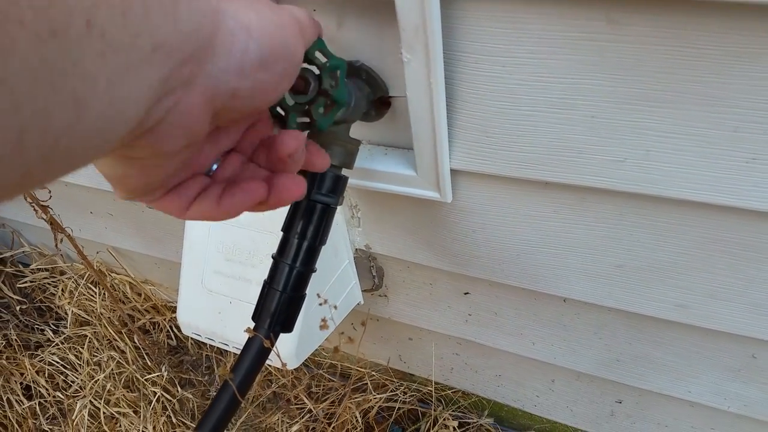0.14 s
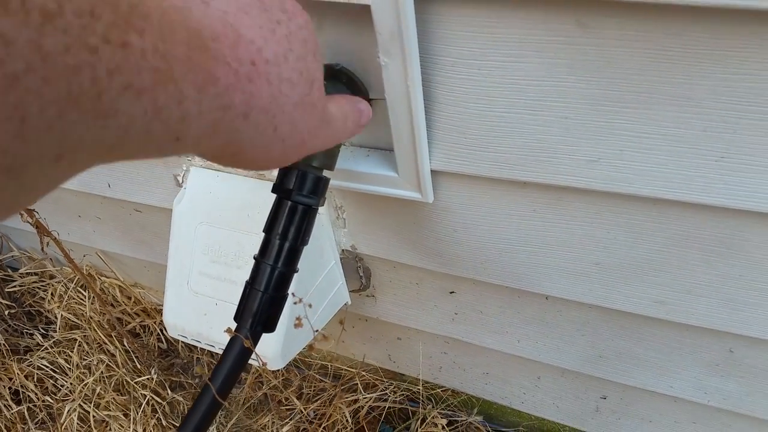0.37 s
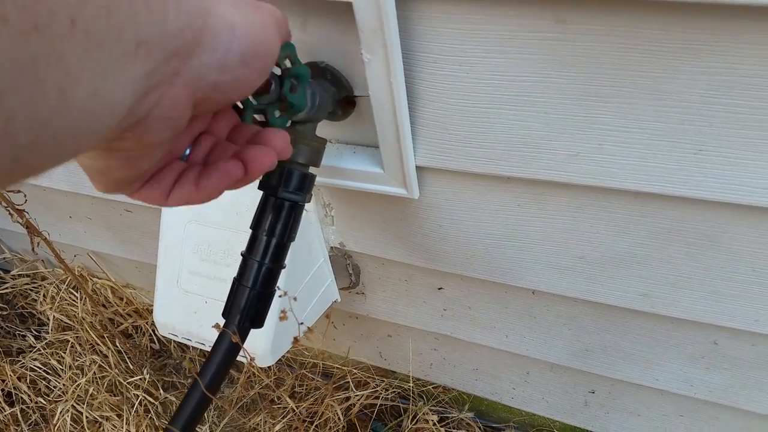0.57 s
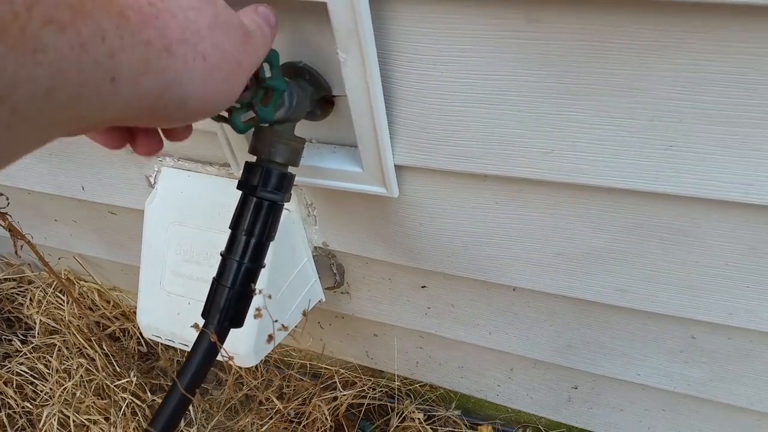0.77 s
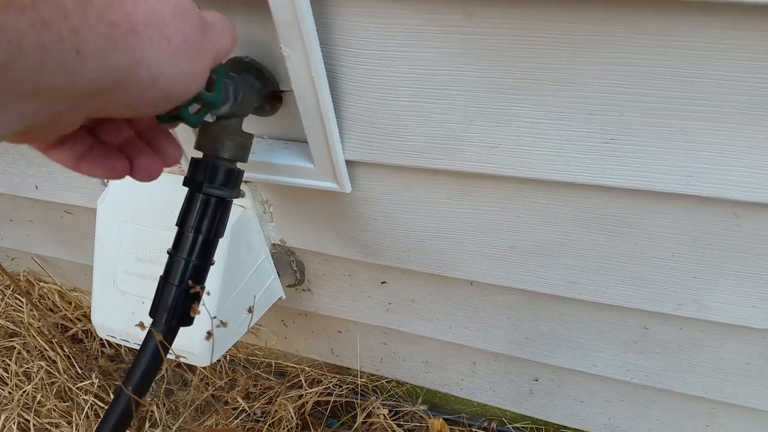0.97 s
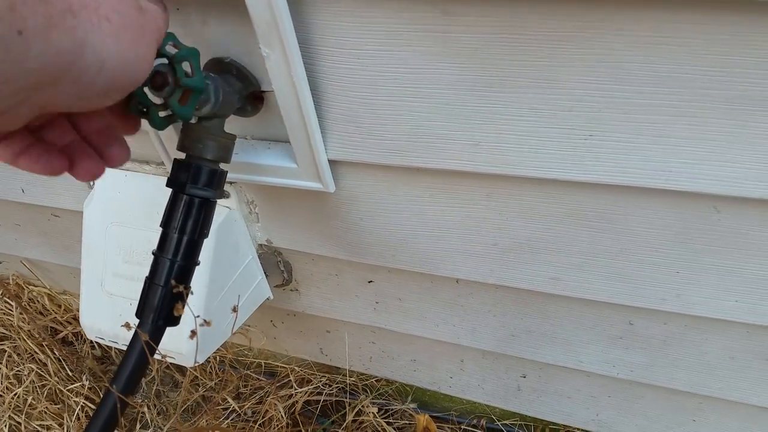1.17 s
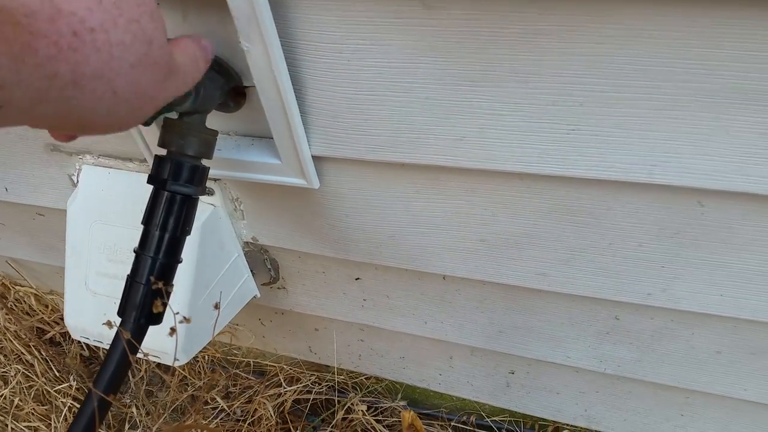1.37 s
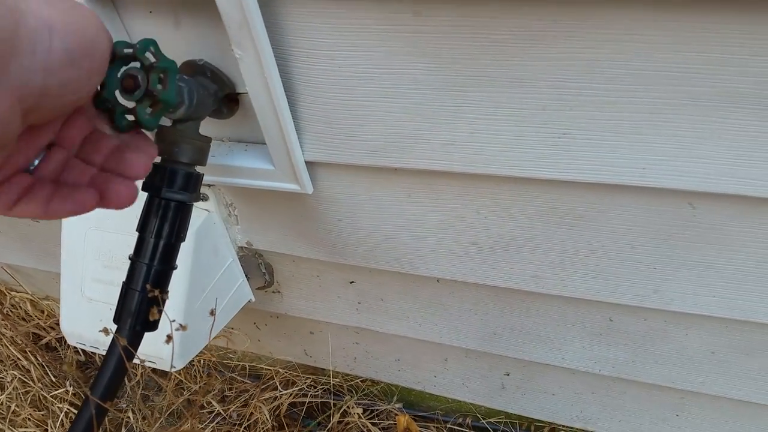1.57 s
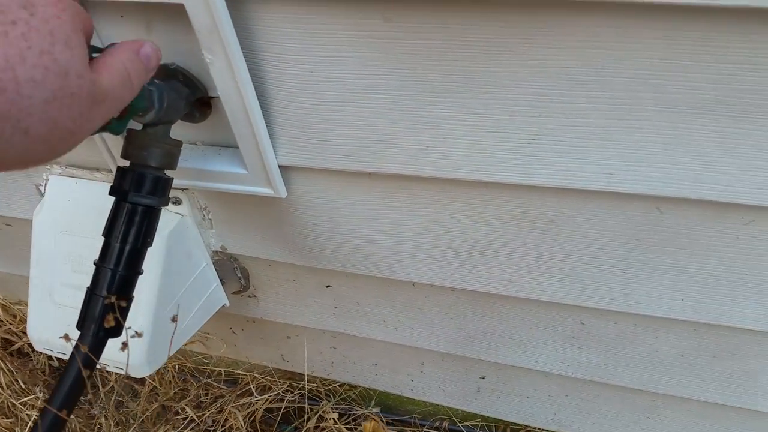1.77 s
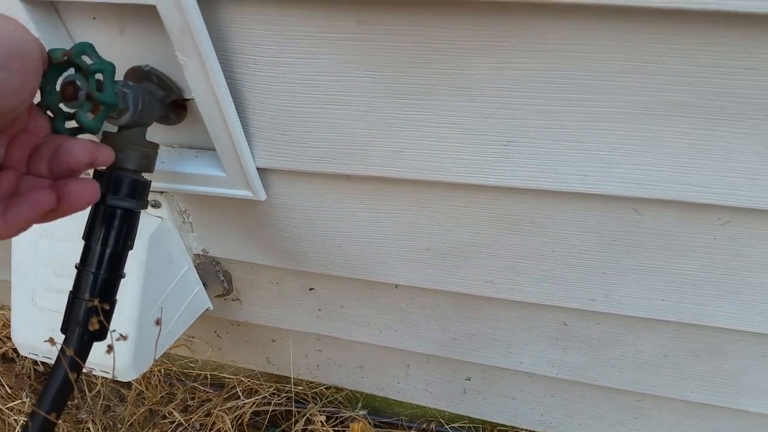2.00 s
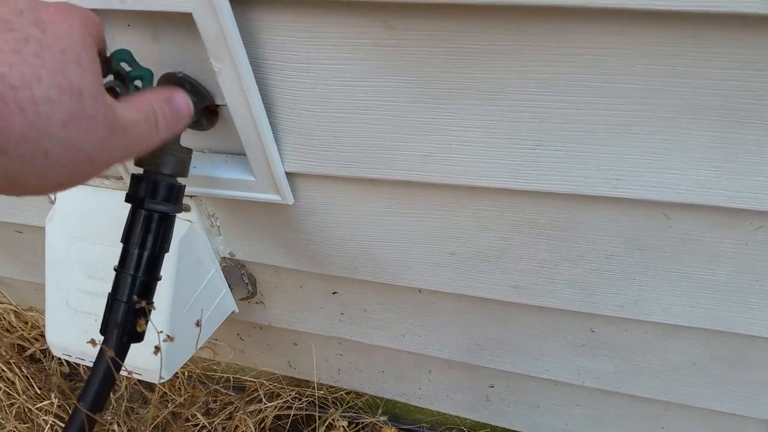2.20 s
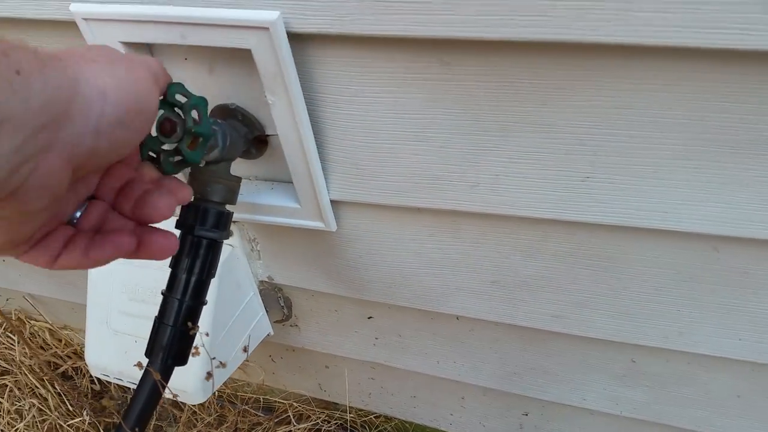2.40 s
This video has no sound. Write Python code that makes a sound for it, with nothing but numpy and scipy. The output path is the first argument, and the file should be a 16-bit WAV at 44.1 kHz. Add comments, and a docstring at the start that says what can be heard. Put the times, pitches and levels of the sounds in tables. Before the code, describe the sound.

A metal garden tap wheel squeaks five times as a hand turns it, thin high whistles and lower rough chirps, with finger rubs and soft knocks between, close stereo phone microphones outdoors by a house wall.

```python
"""Squeaking garden tap

Outdoors, a hand turns the wheel of a metal tap five times, close to a phone's two microphones.
The dry stem sticks and slips: unsteady partials whistle on the wheel's resonance, chirp an octave
lower and once groan, and the wheel rings on. Fingers rub and bump the wheel as shaped noise and
damped knocks. A wall answers briefly, over a low outdoor rumble and faint hiss."""
import sys
import numpy as np
from scipy import signal
from scipy.fft import rfft, irfft, next_fast_len
from scipy.io import wavfile
from scipy.ndimage import uniform_filter1d, map_coordinates

SR = 44100
rng = np.random.default_rng(int(sys.argv[2]) if len(sys.argv) > 2 else 0)


def dump_mix(stems):
    """Bounce the given channels to the path in sys.argv[1] as a 16-bit WAV at rate SR."""
    frames = np.atleast_2d(stems).T  # one column per channel
    limited = np.clip(frames, -1, 1)  # hard clip at full scale
    pcm = np.round(limited * 32767).astype(np.int16)
    wavfile.write(sys.argv[1], SR, pcm)


def volts_from_db(level):
    """Convert decibel levels to linear amplitude ratios."""
    exponent = np.asarray(level, float) / 20
    return 10 ** exponent


N = 108045  # length in samples

# Stem levels hold ahead of the wheel's resonance.
# Whistles of the stem, one list a whistle. Each row: time in seconds, pitch in Hz, level in dB.
WHISTLES = [
    [(0.19, 4142, -84), (0.212, 4147, -39.5), (0.226, 4176, -39), (0.256, 4180, -67), (0.294, 4216, -46.5),
     (0.324, 4206, -68.5)],
    [(0.65, 4041, -90), (0.672, 4075, -48), (0.69, 4180, -66), (0.706, 4154, -69), (0.725, 4218, -99),
     (0.74, 4294, -47), (0.748, 4264, -41), (0.768, 4110, -70), (0.778, 4170, -56), (0.802, 4180, -64),
     (0.818, 4160, -49), (0.84, 4160, -73)],
    [(1.12, 4186, -105), (1.144, 4158, -43), (1.197, 4096, -31.5), (1.212, 4010, -60)],
    [(1.21, 4200, -61), (1.222, 4093, -42), (1.258, 4056, -52.5), (1.266, 4086, -41.5), (1.31, 4080, -99)],
    [(1.6, 4200, -133), (1.61, 4040, -44), (1.618, 4023, -36.5), (1.637, 4079, -47), (1.65, 4070, -56),
     (1.658, 4170, -50), (1.676, 4203, -54.5), (1.72, 4110, -80)],
    [(2.07, 3996, -103), (2.082, 4137, -36.5), (2.102, 4177, -37), (2.118, 4155, -62.5), (2.131, 4170, -42),
     (2.149, 4074, -44.5), (2.168, 4244, -58.5), (2.19, 4100, -86)],
]
# Whistle overtones. Each row: partial number, dB over the overtone level.
WHISTLE_OVERTONES = [(2, 8.5), (3, -0.5)]
# Overtone level in dB of each whistle when its fundamental is at -33 dB.
WHISTLE_OVERTONE_DB = [-51, -47, -53.5, -41, -59, -42]
# Lower chirps, one list a chirp. Each row: time in seconds, pitch in Hz, level in dB, overtone level in dB.
CHIRPS = [
    [(.26, 2578, -63, -92), (.268, 2520, -47, -65), (.273, 2193, -37.5, -59), (.286, 2223, -41, -55.5),
     (.296, 2056, -47.5, -66.5), (.308, 2000, -64, -94)],
    [(.724, 2960, -62, -116), (.733, 2570, -43.5, -67), (.741, 2174, -38, -57.5), (.751, 2236, -34.5, -56),
     (.758, 2110, -52, -68), (.766, 2000, -58, -92)],
    [(2.054, 3410, -75, -99), (2.066, 2890, -68.5, -109), (2.075, 2460, -50, -87), (2.094, 2340, -78, -99)],
    [(2.126, 2211, -60, -85), (2.133, 2090, -55, -65), (2.14, 2078, -39.5, -51), (2.146, 2088, -40, -53.5),
     (2.152, 2114, -47, -60.5), (2.161, 2160, -60, -102), (2.176, 2150, -80, -99)],
]
# Chirp overtones. Each row: partial number, dB over the overtone level.
CHIRP_OVERTONES = [(2, 6.5), (3, 5.5), (4, -11), (5, -4.5), (6, -6.5), (7, -17)]
# One rising chirp. Each row: time in seconds, pitch in Hz, level in dB, overtone level in dB.
RISE = [(0.746, 2300, -51, -44), (0.766, 2775, -42.5, -57), (0.782, 3120, -47.5, -53),
        (0.81, 3230, -73, -88)]
# Its overtone. Each row: partial number, dB over the overtone level.
RISE_OVERTONES = [(2, 0)]
# The groan. Each row: time in seconds, pitch in Hz, level in dB, overtone level in dB.
GROAN = [(1.622, 699, -50, -84), (1.638, 705.4, -32.5, -50.5), (1.648, 648, -24.5, -38.5),
         (1.657, 620, -30, -49), (1.664, 640, -31.5, -56), (1.678, 604, -75, -76)]
# Groan overtones. Each row: partial number, dB over the overtone level.
GROAN_OVERTONES = [(2, 3.5), (3, -7.5), (4, -4.5), (5, -3)]
# The hand shades each sound anew at the two microphones. Each row: fundamental left over right in dB,
# its left lead in radians, overtones left over right in dB, their left lead in radians.
WHISTLE_SHADE = [(-12.5, 1.8, -9, -1.5), (-12.5, 4.5, -8, 4.5), (-11.5, -2.2, -2, 1.73), (-6, 4.5, -8, 1.5),
                 (-10, -2, -5, -2.5), (-8.5, 2, -14, 0.9)]
CHIRP_SHADE = [(1.7, 1.34, -19, 0.44), (1.5, 1.7, -24, 0.97), (2.9, 1.3, -1, .6), (4.8, 1.8, -27, 1.1)]
# The same four columns, a single row each.
RISE_SHADE = (-1.5, -2, -27, 5)
GROAN_SHADE = (-0.15, 0.95, -0.39, -1.5)
# Pitch unsteadiness of each kind of slip, as a fraction of pitch; one value a chirp.
JITTER = dict(whistle=.0035, chirp=[.025, .032, .14, .03], rise=.03, groan=.035)
# Modes of the wheel. Each row: frequency in Hz, width in Hz, peak of the ringing in dB over the stem.
WHEEL_MODES = [(2043, 38, 2), (4193, 51, -11.5), (6140, 47, -18)]
# Hand and stem rubbing. Each row: time in seconds, level in dB.
SCRAPE_LEVEL = [(0, -52.5), (.05, -67), (.19, -58), (.3, -50.5), (.46, -46.5), (.55, -62), (.72, -50.5),
                (.83, -57), (1.08, -64), (1.21, -46), (1.3, -59.5), (1.58, -64), (1.69, -40), (1.78, -63),
                (2.03, -63), (2.13, -39.5), (2.2, -61), (2.45, -63.5)]
# Scrape spectrum. Each row: frequency in Hz, relative density in dB per Hz.
SCRAPE_SPECTRUM = [(150, -36), (250, 5), (400, 0.5), (490, -8.5), (650, -2), (900, -7.5), (1400, -17.5),
                   (4000, -27.5), (7000, -34), (9000, -53)]
# Bumps of the grip. Each row: time in seconds, level in dB.
GRIP_LEVEL = [(0.0, -57.5), (0.8, -48), (0.85, -57), (1.23, -45), (1.4, -67), (1.45, -42.5), (1.59, -54.5),
              (1.7, -38), (1.84, -58), (1.9, -49), (2.01, -56.5), (2.13, -44.5), (2.45, -67.5)]
# Grip spectrum. Each row: frequency in Hz, relative density in dB per Hz.
GRIP_SPECTRUM = [(60, -11), (120, 8.5), (230, 7.5), (400, -10.5), (700, -25.5), (1500, -67)]
# Skin slides or metal rasps. Each row: start in seconds, nominal length in seconds, level of the duller
# noise in dB, level of the fizz in dB.
SLIDES = [(0, 0.033, -63, -72), (0.204, 0.037, -60.5, -94), (0.265, 0.041, -59.5, -63.5),
          (0.504, 0.13, -60, -64.5), (0.658, 0.16, -66, -73.5), (1.141, 0.086, -63.5, -73),
          (1.644, 0.068, -78, -68), (2.07, 0.04, -61, -72), (2.131, 0.026, -47, -75),
          (2.355, 0.021, -69.5, -75)]
# Duller noise of the slides. Each row: frequency in Hz, relative density in dB per Hz.
SLIDE_SPECTRUM = [(900, -39), (1500, -0.5), (3400, -0.5), (6500, -2.5), (8000, -6), (12000, -60)]
# Fizz of the slides. Each row: frequency in Hz, relative density in dB per Hz.
FIZZ_SPECTRUM = [(5000, -26), (7500, -4), (11000, 7.5), (15700, 1)]
# Knocks of finger and wheel. Each row: start in seconds, nominal peak in dB, lower mode in Hz.
TICKS = [(0.314, -34, 164), (0.332, -30, 203), (0.384, -38.5, 425), (.432, -36, 387), (.445, -33.5, 635),
         (.616, -45.5, 4460), (0.888, -36.5, 400), (0.896, -37.5, 640), (1.443, -29.5, 174),
         (1.601, -35.5, 261), (1.679, -34, 410), (1.692, -35, 362), (1.71, -30, 230), (1.728, -33, 164),
         (1.75, -39, 960), (1.896, -36.5, 164), (2.124, -29, 635), (2.149, -25.5, 304), (2.273, -43, 590),
         (2.358, -39.5, 247)]
# Outdoor air. Each row: frequency in Hz, relative density in dB per Hz.
AIR_SPECTRUM = [(30, -22), (44, -9), (56, 4.5), (68, 4.5), (110, -1.5), (250, -11.5), (400, -26),
                (500, -55), (700, -45.5), (1300, -31), (4000, -38.5), (9000, -42.5), (15700, -39.5)]
# Likeness of noise at the two microphones. Each row: frequency in Hz, correlation from -1 to 1.
MIC_CORRELATION = [(60, 0.98), (290, 0.93), (640, 0.47), (1400, -0.093), (15000, 0.062)]


def unit(x):
    """Scale to an rms of 1."""
    return x / np.sqrt(np.mean(x ** 2) + 1e-20)


def along(points, hz):
    """Interpolate (Hz, value) points on a log frequency axis."""
    f, value = np.transpose(points)
    return np.interp(np.log(hz + 1), np.log(f + 1), value)


def wobble(rate, size):
    """A smooth random curve through `rate` random knots a second."""
    knots = rng.standard_normal(int(size * rate / SR) + 4)
    return map_coordinates(knots, [np.arange(size) * rate / SR])


def filtered(x, response):
    """Multiply the spectrum of x by a response given as a function of Hz."""
    size = next_fast_len(N + 8192)
    spectrum = rfft(x, size) * response(np.fft.rfftfreq(size, 1 / SR))
    return irfft(spectrum, size)[..., :N]


def level(rows):
    """Gain per sample, gliding in dB between (seconds, dB) rows."""
    s, db = np.transpose(rows)
    return volts_from_db(np.interp(np.arange(N) / SR, s, db))


def rush(spectrum, pulses=1):
    """Shaped noise of rms 1, optionally lumpy; mid and side shares set how alike the microphones are."""
    def mid_side_response(hz):
        angle = np.arccos(np.clip(along(MIC_CORRELATION, hz), -1, 1)) / 2
        return volts_from_db(along(spectrum, hz)) * [np.cos(angle), np.sin(angle)]

    mid, side = filtered(rng.standard_normal((2, N)) * pulses, mid_side_response)
    return unit(np.array([mid + side, mid - side]))


def ears(pan_db, lead):
    """Complex gains of the left and right microphone, whose mean is 1."""
    q = volts_from_db(pan_db) * np.exp(1j * lead)
    return 2 * np.array([[q], [1]]) / (1 + q)


def slip(rows, overtones, shade, jitter, flutter_db, grit):
    """One stick-slip tone: unsteady partials, the overtones mixed with dull noise gated once a cycle."""
    shade_top_hz = 10000  # overtones above are equally loud at both microphones
    blur_rad_per_jitter = 28  # unsteady slips smear each overtone's phase
    grit_top_hz = 7200
    s, hz, db, overtone_db = np.transpose(rows)
    i = np.arange(round(s[0] * SR), round(s[-1] * SR))
    size = len(i)

    def at(column):
        return np.interp(i / SR, s, column)

    def flutter():
        return volts_from_db(flutter_db * wobble(345.2, size))

    pitch = at(hz) * (1 + jitter * wobble(908.0, size))
    phase = 2 * np.pi * np.cumsum(pitch) / SR
    fundamental = ears(shade[0], shade[1]) * volts_from_db(at(db)) * flutter() * np.exp(1j * phase)
    upper = 0
    for k, gain_db in overtones:
        pan_db = shade[2] * (k * hz.mean() < shade_top_hz)
        blur = 2 * np.pi * rng.random() + blur_rad_per_jitter * jitter * wobble(498.5, size)
        partial = volts_from_db(gain_db) * flutter() * np.exp(1j * (k * phase + blur))
        upper = upper + ears(pan_db, shade[3]) * partial
    puffs = grit * rng.standard_normal((2, size)) * (1 + np.cos(phase)) ** 2
    puffs = signal.sosfilt(signal.butter(8, grit_top_hz, fs=SR, output="sos"), puffs)

    overtone_gain = volts_from_db(at(overtone_db))
    tone = fundamental + overtone_gain * upper
    out = np.zeros((2, N))
    out[:, i] = np.sqrt(2) * tone.real + overtone_gain * puffs
    out[:, i] *= signal.windows.tukey(size, 0.1)
    return out


def stem():
    """Dry stem sticking and slipping: whistles brighter when louder, rougher chirps, one gritty groan."""
    full_db, overtone_growth = -33, 2.28  # reference level; overtone dB per dB of the whistle
    out = np.zeros((2, N))
    for rows, full_overtone_db, shade in zip(WHISTLES, WHISTLE_OVERTONE_DB, WHISTLE_SHADE):
        bright = [(*row, full_overtone_db + overtone_growth * (row[2] - full_db)) for row in rows]
        out += slip(bright, WHISTLE_OVERTONES, shade, JITTER["whistle"], flutter_db=1.5, grit=0.05)
    for rows, shade, jitter in zip(CHIRPS, CHIRP_SHADE, JITTER["chirp"]):
        out += slip(rows, CHIRP_OVERTONES, shade, jitter, flutter_db=4.5, grit=0.44)
    out += slip(RISE, RISE_OVERTONES, RISE_SHADE, JITTER["rise"], flutter_db=3.0, grit=0.77)
    return out + slip(GROAN, GROAN_OVERTONES, GROAN_SHADE, JITTER["groan"], flutter_db=0.2, grit=0.75)


def wheel(x):
    """The wheel's modes, as resonances added to the stem's direct sound, ring on after each slip."""
    def response(f):
        return 1 + sum(volts_from_db(db) * 1j * f * width / (hz * hz - f * f + 1j * f * width)
                       for hz, width, db in WHEEL_MODES)

    return filtered(x, response)


def scrape():
    """Grainy rubbing: noise swelling with loose random knocks, each smoothed to a few milliseconds."""
    knocks_per_s = 300
    knocks = (rng.random(N) < knocks_per_s / SR) * volts_from_db(2.4 * rng.standard_normal(N))
    smooth = uniform_filter1d(uniform_filter1d(knocks, size=130), size=130)
    return level(SCRAPE_LEVEL) * rush(SCRAPE_SPECTRUM, 0.11 + smooth * 9)


def grip():
    """Dull bumps of the gripping hand: low noise of uneven strength."""
    return level(GRIP_LEVEL) * rush(GRIP_SPECTRUM, volts_from_db(3.35 * wobble(44.92, N)))


def slides():
    """Skin slides or metal rasps: grainy bursts of two noise bands, quick to start, slower to fade."""
    t = np.arange(N) / SR
    shapes = []
    for start, length, *_ in SLIDES:
        rise = (t - start) / 0.0027
        fall = (start + length - t) / (0.44 * length) + 0.54  # about half gain at the nominal length
        shapes.append(np.clip(np.minimum(rise, fall), 0, 1))
    dull, fizz = volts_from_db(np.array(SLIDES)[:, 2:]).T @ np.array(shapes)
    grain = volts_from_db(2.1 * wobble(260, N))
    return dull * rush(SLIDE_SPECTRUM, grain) + fizz * rush(FIZZ_SPECTRUM, grain)


def ticks():
    """Soft knocks of finger and wheel: a few damped cycles of two modes, alike at both microphones."""
    out, t = np.zeros(N + SR), np.arange(SR // 10) / SR
    for s, db, hz in TICKS:
        ring = np.sin(2 * np.pi * hz * t) + 0.19 * np.sin(2 * np.pi * 1.596 * hz * t)
        decay = volts_from_db(db - 60 * t / (0.0075 + 6 / hz))  # lower knocks ring longer
        onset = 1 - np.exp(-t * hz * 5)
        out[round(s * SR):][:len(t)] += decay * ring * onset
    return out[:N]


def hand():
    """The hand on the wheel: rubbing, bumps, slides and knocks together."""
    return scrape() + grip() + slides() + ticks()


def wall(x):
    """Short answer of the house wall and ground: the tap convolved with decaying noise."""
    t60_s, wall_db = 0.14, -15
    t = np.arange(SR // 4) / SR
    tail = rng.standard_normal((2, len(t))) * volts_from_db(-60 * t / t60_s)
    tail /= np.linalg.norm(tail[0])
    return volts_from_db(wall_db) * signal.fftconvolve(x, tail, axes=1)[:, :N]


def air():
    """Low outdoor rumble and faint hiss: steady noise whose level drifts slightly around -51.5 dB."""
    return volts_from_db(-51.5 + 0.21 * wobble(4.6, N)) * rush(AIR_SPECTRUM)


def scene():
    """Close tap with its ringing wheel, the hand on it, the wall's answer and outdoor air."""
    tap = wheel(stem())
    return tap + hand() + wall(tap) + air()


def low_pass(x):
    """Removes everything above the highest recorded frequency."""
    return signal.sosfilt(signal.butter(12, 15700, fs=SR, output="sos"), x)


def record(dry):
    """The phone's pickup: nothing passes from 15750 Hz up."""
    mix = filtered(dry, lambda hz: hz < 15750)
    return low_pass(mix)


dry = scene()
out = record(dry)
dump_mix(out)
```